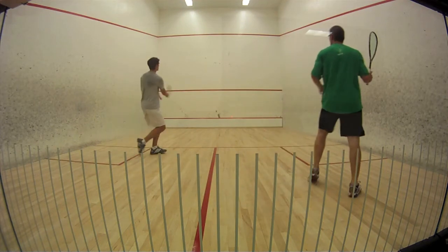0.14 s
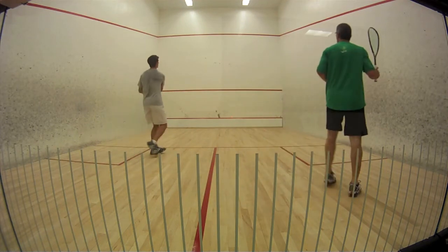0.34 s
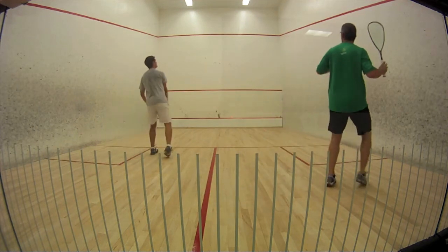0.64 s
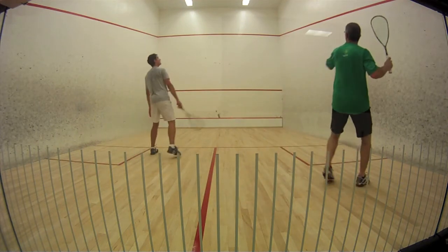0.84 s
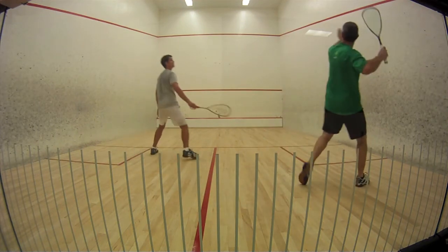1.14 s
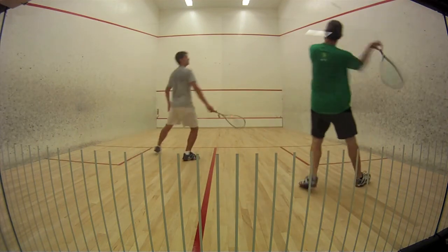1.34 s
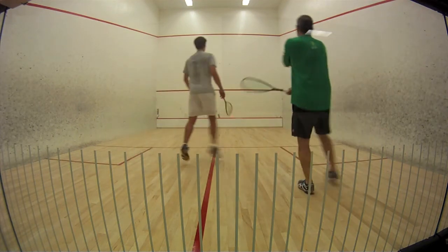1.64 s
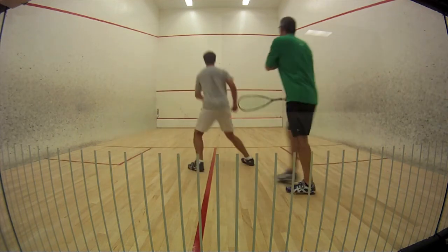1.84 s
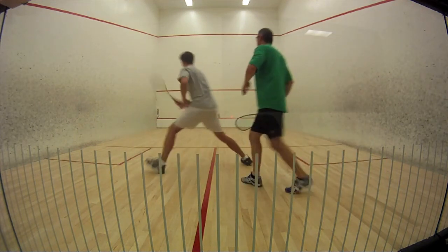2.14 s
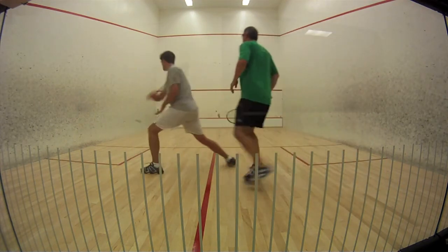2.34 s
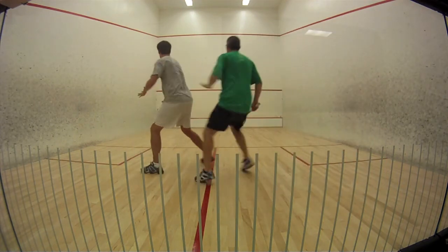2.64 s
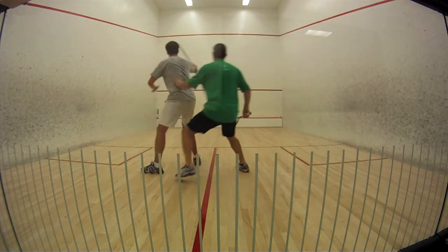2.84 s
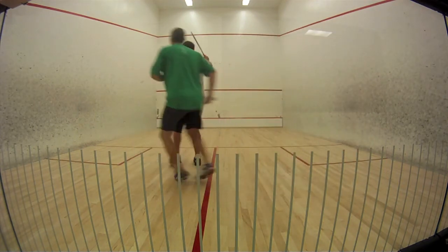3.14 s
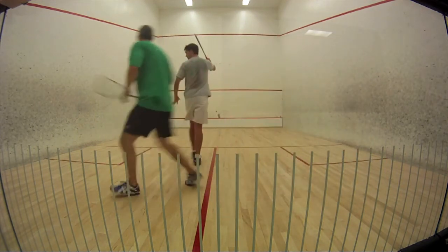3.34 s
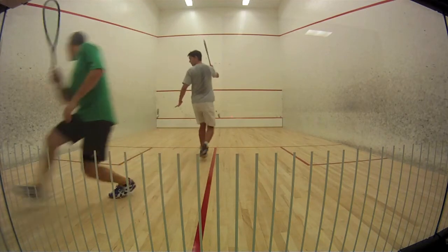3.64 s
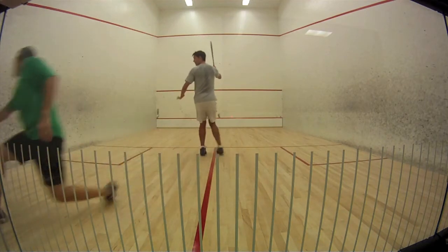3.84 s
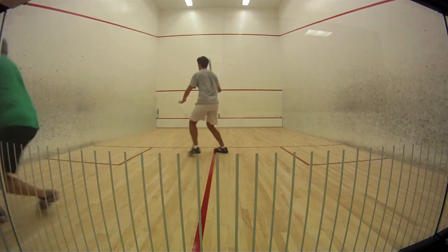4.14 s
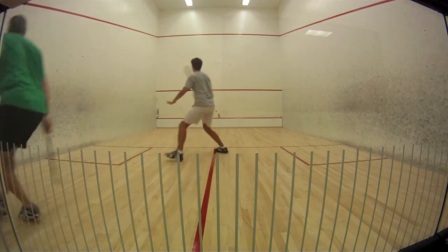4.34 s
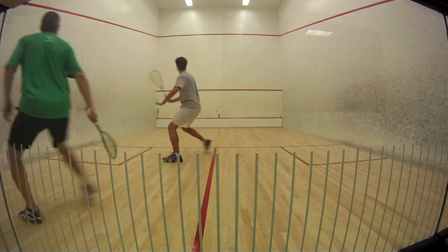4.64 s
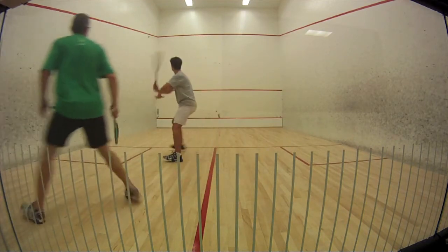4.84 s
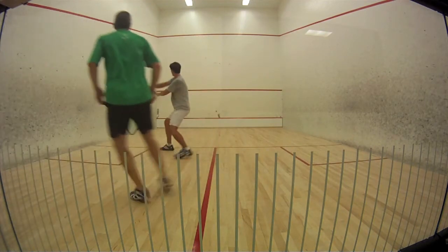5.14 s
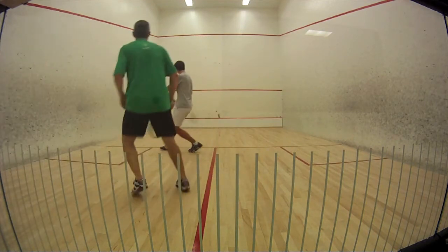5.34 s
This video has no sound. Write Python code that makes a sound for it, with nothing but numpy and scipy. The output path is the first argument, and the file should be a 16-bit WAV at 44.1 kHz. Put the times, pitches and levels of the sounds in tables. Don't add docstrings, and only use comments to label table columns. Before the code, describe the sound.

Squash rally in a hard, ringing court: sharp ball cracks off rackets and walls, brief shoe squeaks, and low thumping footsteps.

```python
import sys
import numpy as np
from scipy import signal
from scipy.fft import rfft, irfft
from scipy.io import wavfile
from scipy.ndimage import uniform_filter1d

SR = 44100
rng = np.random.default_rng(int(sys.argv[2]) if len(sys.argv) > 2 else 0)


def gain_from_decibels(decibels):
    exponent = np.asarray(decibels, float) / 20
    return 10 ** exponent


def store_wav(level_fs):
    pcm = np.round(np.clip(np.atleast_2d(level_fs), -1, 1) * 32767)
    wavfile.write(sys.argv[1], SR, pcm.T.astype(np.int16))


N = 242550


def colour(points, size):
    hz, db = np.transpose(points)
    bins_hz = np.fft.rfftfreq(size, 1 / SR)
    return gain_from_decibels(np.interp(np.log(bins_hz + 1), np.log(hz), db))


def causal(points, size=2048):
    cepstrum = irfft(np.log(colour(points, size)))
    cepstrum[1:size // 2] *= 2
    cepstrum[size // 2 + 1:] = 0
    return irfft(np.exp(rfft(cepstrum)))


def band(x, lo_hz, hi_hz):
    y = signal.sosfilt(signal.butter(2, [lo_hz, hi_hz], "bandpass", fs=SR, output="sos"), x)
    return y / np.sqrt(np.sum(y ** 2))


def add(track, start_s, x):
    i = int(start_s * SR)
    x = x[:N - i]
    track[i:i + len(x)] += x


def air():
    # frequency_hz, density_db (per Hz)
    spectrum = [(12, -23), (20, -0.5), (101, 6.5), (607, -9), (1130, -11.5), (1470, -9.5), (2260, -9),
                (2800, -14.5), (3630, -15), (5330, -18), (6000, -26), (7800, -60), (13200, -120)]
    x = irfft(rfft(rng.standard_normal(N)) * colour(spectrum, N), N)
    steps_db = np.repeat(rng.standard_normal(N // 4000 + 1), 4000)[:N]
    drift_db = uniform_filter1d(steps_db, 6000)
    return gain_from_decibels(-59 + drift_db) * x / np.std(x)


def casing():
    # frequency_hz, gain_db
    case_colour = [(60, -18), (600, -7), (720, -2), (1100, -7), (1400, -3.5), (1900, -3), (2450, -5),
                   (2850, -9.5), (3300, 7), (4000, -3.5), (4500, -16.5), (5300, -8.5), (5950, -13.5)]
    # frequency_hz, width_hz, gain_db
    mode = (2228, 167, 11.78)
    hz, width_hz, gain_db = mode
    broad = causal(case_colour)
    peak = signal.lfilter(*signal.iirpeak(hz, hz / width_hz, fs=SR), broad)
    return broad + (gain_from_decibels(gain_db) - 1) * peak


def struck_ball(peak_db, body_db, body_hz, slap_hz, crack_db):
    over_db = peak_db + 30
    crack_db = crack_db + 0.038 * over_db
    thud_db = -6.5 - 0.41 * over_db
    noise = rng.standard_normal(2000)
    t = np.arange(len(noise)) / SR
    blow = (t == 0) + 0.057 * noise * np.exp(-t / 0.0037)
    slap = band(blow, slap_hz, 3314)
    body = band(blow, 0.929 * body_hz, 1.152 * body_hz)
    crack = band(blow, 3170, 5510)
    thud = band(blow, 200, 427)
    mix = slap + gain_from_decibels(body_db + 1.0) * body + gain_from_decibels(crack_db) * crack + gain_from_decibels(thud_db) * thud
    return gain_from_decibels(peak_db - 11) * np.convolve(mix, casing())


def wall_and_string_blows():
    # start_s, peak_db, body_db (relative to peak), body_pitch_hz, lowest_slap_hz
    blows = [(0.044, -43, -6, 850, 1300), (0.077, -42.5, -3, 1200, 1490), (0.3463, -28.5, -4.5, 1100, 1300),
             (0.4688, -48, -27, 1076, 1250), (1.4641, -32.5, -6, 927, 1380), (1.529, -28, -0.5, 1130, 1140),
             (1.6805, -16.5, -9, 778, 1780), (1.688, -34.5, 8, 1038, 1660),
             (2.555, -36.5, -0.5, 1170, 1240), (2.584, -32, -5.5, 790, 1230),
             (2.767, -21.5, -10.5, 777, 1150), (3.94, -43, -3.5, 773, 1415), (4.009, -38.5, -17, 790, 1300),
             (4.383, -31, -8, 1140, 1030), (4.477, -46, -28, 1037, 1200), (5.1, -47.5, -12, 850, 1250),
             (5.2878, -27.5, -3, 1044, 1620), (5.4524, -20.5, -6, 770, 1480)]
    return [(start_s, struck_ball(*blow, crack_db=-1)) for start_s, *blow in blows]


def footfall(level_db, pitch_hz):
    noise = rng.standard_normal(4000)
    t = np.arange(len(noise)) / SR
    boom = band(noise * t * np.exp(-t / 0.0085), 0.76 * pitch_hz, 1.11 * pitch_hz)
    scuff = band(noise * t * np.exp(-t / 0.0018), 230, 860)
    return gain_from_decibels(level_db - 16.5) * (boom + gain_from_decibels(-9.5) * scuff)


def footfalls():
    # start_s, peak_db, pitch_hz
    steps = [(0.718, -65, 125), (1.219, -79, 73.1), (1.847, -46, 157), (2.548, -40.5, 170),
             (2.779, -35.5, 99), (2.919, -44.5, 165.5), (3.596, -39, 126), (3.7, -46, 156),
             (3.808, -37, 126), (3.88, -41.5, 133), (3.97, -45.5, 176), (4.089, -75, 180),
             (5.099, -43, 119), (5.269, -39, 96)]
    return [(start_s, footfall(*step)) for start_s, *step in steps]


def squeak(length_s, pitch_hz, level_db, sag, rough):
    n = int(length_s * SR)
    u = np.arange(n) / n
    chance = rng.standard_normal((2, n))
    shake = uniform_filter1d(uniform_filter1d(chance, 40, axis=1), 40, axis=1) * 7.7
    hz = pitch_hz * (1 + sag / 2 - sag * u) * (1 + 0.06 * rough * shake[0])
    tone = np.sin(2 * np.pi * np.cumsum(hz) / SR)
    x = tone * np.exp(rough * shake[1] / 2) * np.sin(np.pi * np.sqrt(u))
    return gain_from_decibels(level_db - 1) * x / np.sqrt(np.sum(x ** 2))


def sole_whistles():
    # start_s, length_s, middle_pitch_hz, level_db
    whistles = [(0.733, 0.0097, 3830, -45), (0.763, 0.014, 3915, -35), (.765, 0.019, 3587, -48.5),
                (0.816, 0.057, 3843, -51), (0.866, 0.012, 3740, -52.5), (0.92, 0.014, 3870, -42),
                (1.144, 0.016, 3965, -67), (1.775, 0.046, 5183, -43.5), (1.865, 0.025, 5120, -52),
                (2.771, 0.013, 3637, -43), (2.884, 0.012, 3567, -40), (3.957, 0.031, 1080, -53),
                (4.031, 0.021, 1100, -59), (5.018, 0.021, 5750, -54), (5.042, 0.012, 5740, -47.5),
                (5.117, 0.045, 5700, -60), (5.264, .018, 4390, -56.5)]
    return [(start_s, squeak(*slip, sag=0.015, rough=0.18)) for start_s, *slip in whistles]


def floor_bounces():
    # start_s, peak_db, body_db (relative to peak), body_pitch_hz
    bounces = [
        (1.494, -33.5, -2.5, 915),
        (2.61, -42.5, 0, 1200),
        (4.035, -49.5, 5, 800),
        (4.795, -53, 3, 1040),
        (5.316, -31, -5, 760),
    ]
    return [(start_s, struck_ball(*bounce, slap_hz=1300, crack_db=-14.5)) for start_s, *bounce in bounces]


def sole_scrapes():
    # start_s, length_s, middle_pitch_hz, level_db
    scrapes = [(1.741, .02, 3570, -50), (2.47, 0.013, 4170, -51), (2.498, 0.012, 4320, -47.5),
               (2.505, .019, 4990, -51.5), (2.535, 0.05, 4100, -50), (2.544, .13, 4950, -65),
               (2.546, .039, 3260, -51.5), (2.737, 0.019, 3514, -42), (2.789, 0.052, 3590, -39),
               (2.79, 0.012, 4300, -43.5), (4.987, .03, 5720, -59)]
    return [(start_s, squeak(*slip, sag=0.043, rough=0.69)) for start_s, *slip in scrapes]


def frame_taps():
    # start_s, level_db, late_ring_share_db, lowest_hz
    taps = [
        (2.801, -55, -13, 1620),
        (3.643, -53, 0.5, 910),
        (3.96, -39, -12, 3430),
        (4.082, -46, -10.5, 1830),
        (5.269, -52, 4, 1520),
    ]
    case = casing()
    sounds = []
    for start_s, level_db, late_db, low_hz in taps:
        click = gain_from_decibels(level_db) * band(np.arange(600) == 0, low_hz, 7300)
        sounds.append((start_s, np.convolve(click, case), late_db))
    return sounds


def mirrors(place, wall_keep, order=4):
    court_m = np.array([6.4, 9.75, 5.6])
    ear = court_m * np.array([0.5, 0.001, 0.12])
    k = np.arange(-order, order + 1)[:, None]
    images = k * court_m + np.where(k % 2, 1 - place, place) * court_m - ear
    x, y, z = np.meshgrid(*images.T, indexing="ij")
    bounces = sum(np.meshgrid(*[np.abs(k[:, 0])] * 3, indexing="ij"))
    r = np.sqrt(x ** 2 + y ** 2 + z ** 2).ravel()
    lag = ((r - r.min()) / 343 * SR).astype(int)
    return np.bincount(lag, wall_keep ** bounces.ravel() * r.min() / r)


def first_arrivals(echoes):
    t = np.arange(len(echoes)) / SR
    highpass = signal.butter(4, 3000, "highpass", fs=SR, output="sos")
    bright = signal.sosfilt(highpass, echoes * np.exp(-t / 0.012))
    return echoes * (1 + 0.36 * np.exp(-t / 0.0073)) + 0.34 * bright


def scatter():
    t60_s, spray_db = 0.041, -15.5
    t = np.arange(4000) / SR
    return (t == 0) + gain_from_decibels(spray_db) * rng.standard_normal(len(t)) * 1000. ** (-t / t60_s)


def ring():
    # frequency_hz, t60_s
    decay = [(100, 0.28), (300, 2.18), (800, 2.64), (2200, 2.53), (3800, 1.75), (5500, 1.92)]
    build_s, flutter_hz, flutter, lumps_db = 0.0073, 42.37, 0.048, 0.5
    t = np.arange(3 * SR) / SR
    hz, t60_s = np.transpose(decay)
    lumps = uniform_filter1d(np.repeat(rng.standard_normal(len(t) // 300), 300), 300)
    beat = 1 + flutter * np.cos(2 * np.pi * flutter_hz * t)
    noise = rng.standard_normal(len(t)) * gain_from_decibels(lumps_db * lumps) * beat
    spectrum = rfft(noise / np.std(noise))
    octave = np.log2(np.fft.rfftfreq(len(t), 1 / SR) + 1)
    out = np.zeros(len(t))
    for centre in np.arange(5, 14, 0.5):
        share = np.clip(1 - 2 * np.abs(octave - centre), 0, 1)
        out += irfft(spectrum * share) * 1000. ** (-t / np.interp(centre, np.log2(hz), t60_s))
    return out * (1 - np.exp(-(t / build_s) ** 2))


def forerunner(dry):
    before = np.arange(1500)
    swell = np.exp((before - before[-1]) / SR / 0.011)
    swelling_noise = gain_from_decibels(-5) * rng.standard_normal(len(before)) * swell
    ahead = signal.fftconvolve(dry, swelling_noise)[len(before):len(before) + N - 1]
    return np.append(ahead, 0)


def scene():
    background = air()
    far = wall_and_string_blows() + footfalls() + sole_whistles() + floor_bounces() + sole_scrapes()
    sounds = [(start_s, x, 0, 0.8) for start_s, x in far]
    sounds += [(start_s, x, late_db, 0.4) for start_s, x, late_db in frame_taps()]
    dry, early = np.zeros(N), np.zeros(N)
    for start_s, x, late_db, wall_keep in sounds:
        add(dry, start_s, x * gain_from_decibels(late_db))
        echoes = first_arrivals(mirrors(rng.uniform(0.15, 0.85, 3), wall_keep))
        sprayed = signal.fftconvolve(x, scatter())
        add(early, start_s, signal.fftconvolve(sprayed, echoes))
    late = signal.fftconvolve(dry, ring())[:N]
    return (late + gain_from_decibels(14) * early + forerunner(dry) + background)[None]


def top_cut(x):
    return signal.sosfilt(signal.butter(12, 16220, fs=SR, output="sos"), x)


def record(dry):
    held_hz = 12000
    guard = signal.butter(6, 5800, fs=SR, output="sos")
    slow = signal.resample_poly(signal.sosfilt(guard, dry), held_hz, SR, axis=1)
    held = signal.resample_poly(np.repeat(slow, 4, axis=1), SR, 4 * held_hz, axis=1)
    top = signal.ellip(10, 0.2, 70, 15400, fs=SR, output="sos")
    mix = signal.sosfiltfilt(top, held[:, :N])
    return top_cut(mix)


dry = scene()
out = record(dry)
store_wav(out)
```